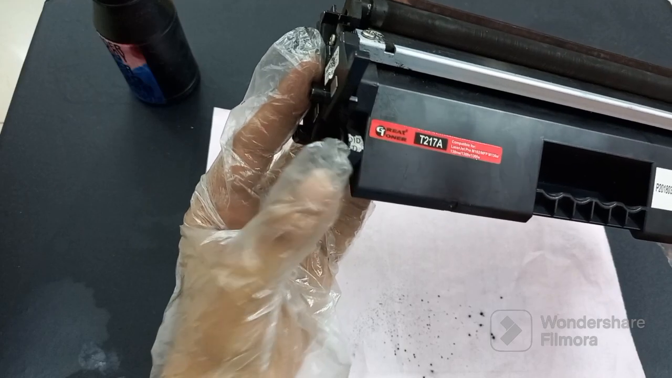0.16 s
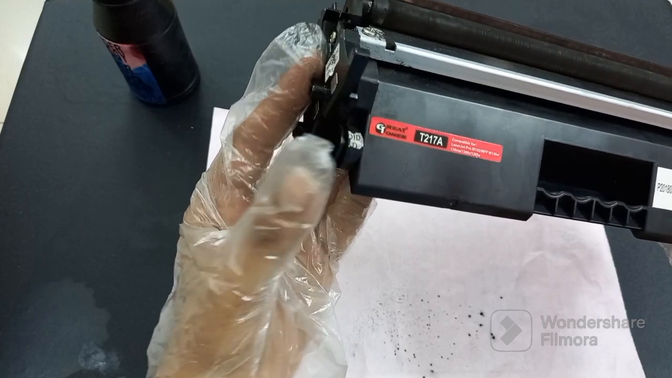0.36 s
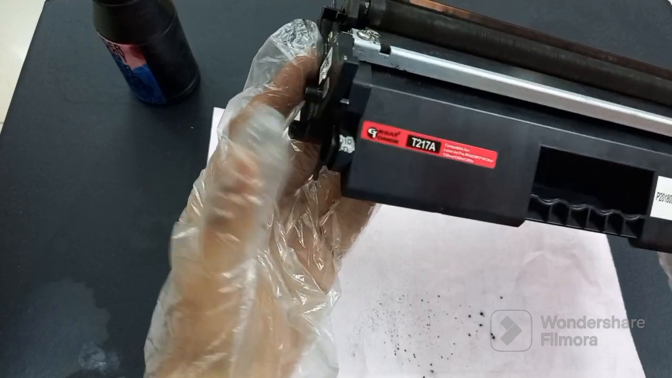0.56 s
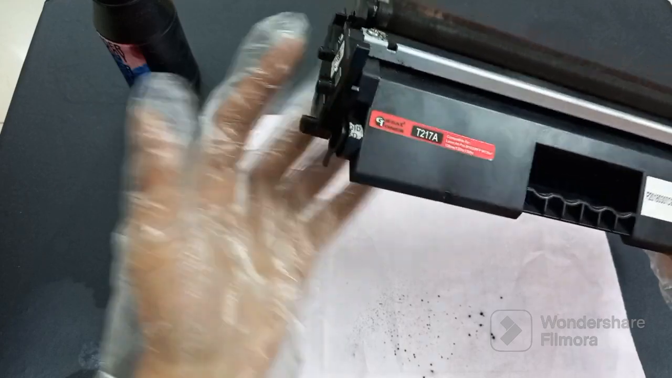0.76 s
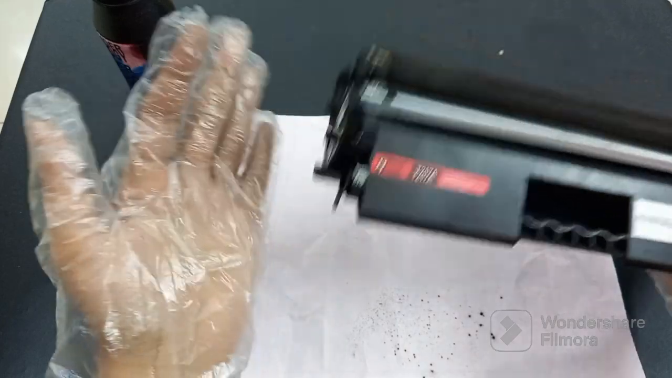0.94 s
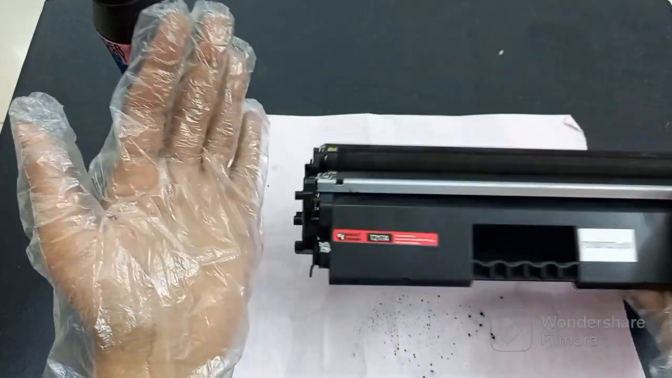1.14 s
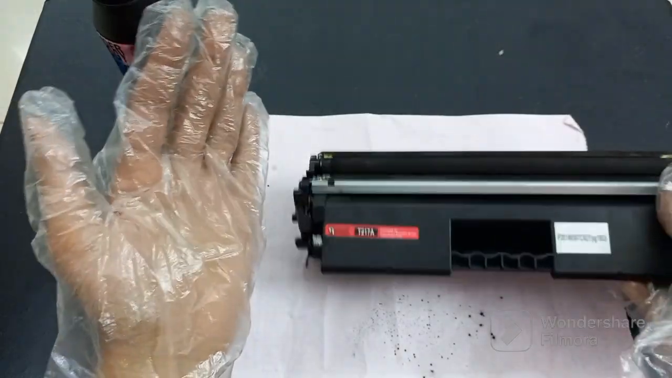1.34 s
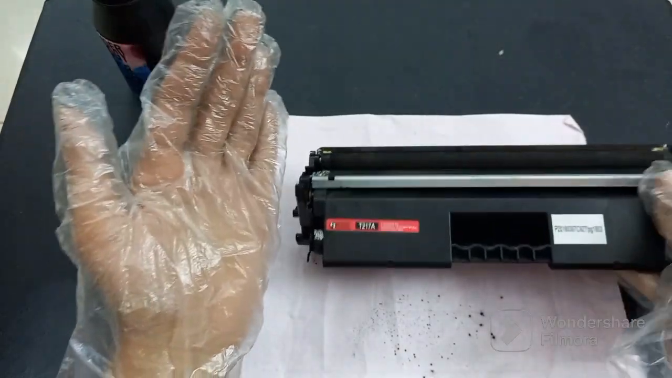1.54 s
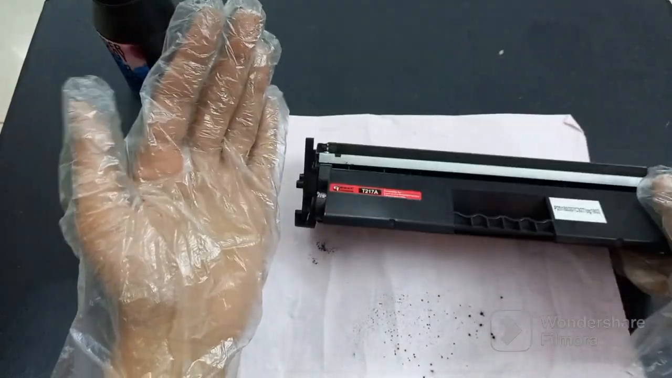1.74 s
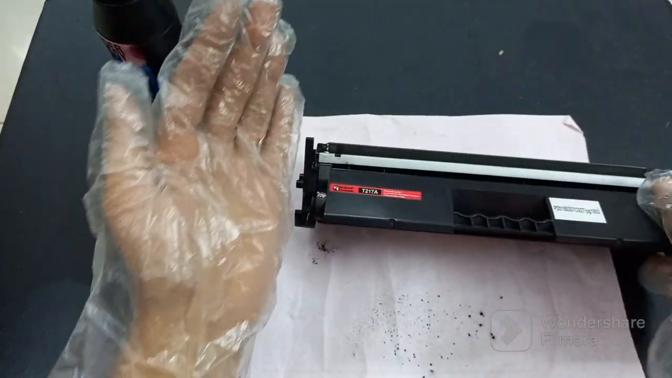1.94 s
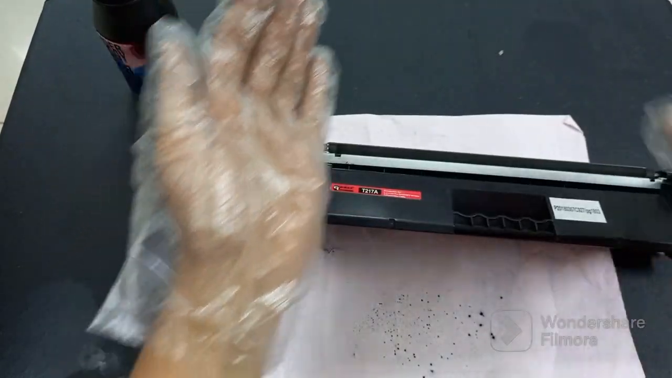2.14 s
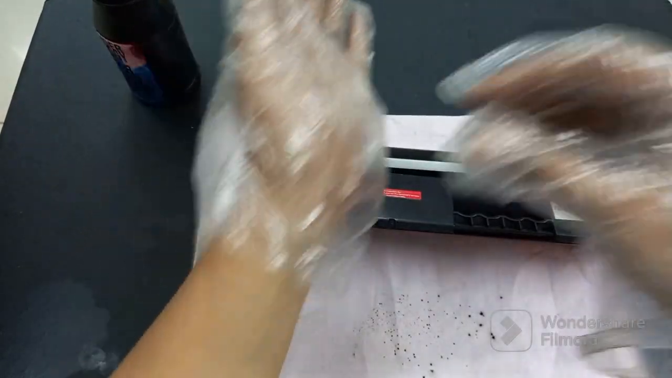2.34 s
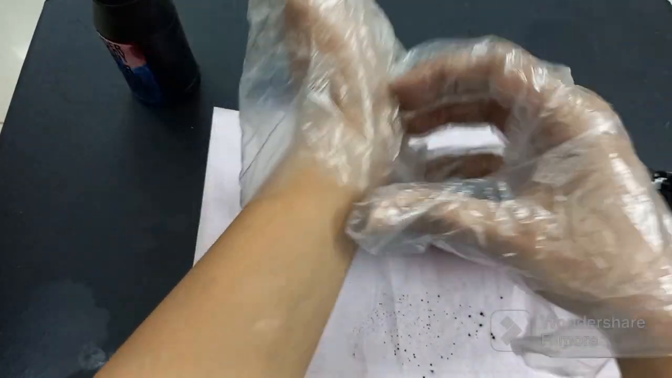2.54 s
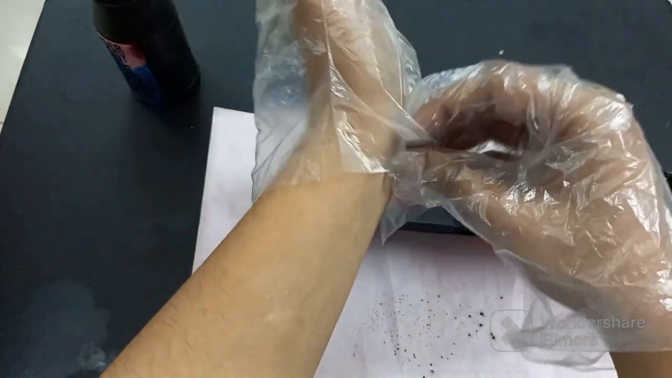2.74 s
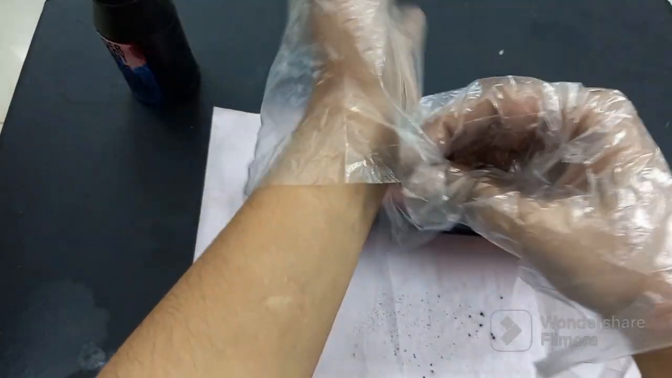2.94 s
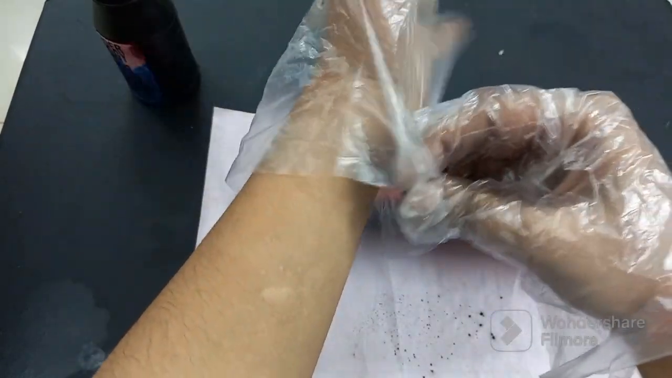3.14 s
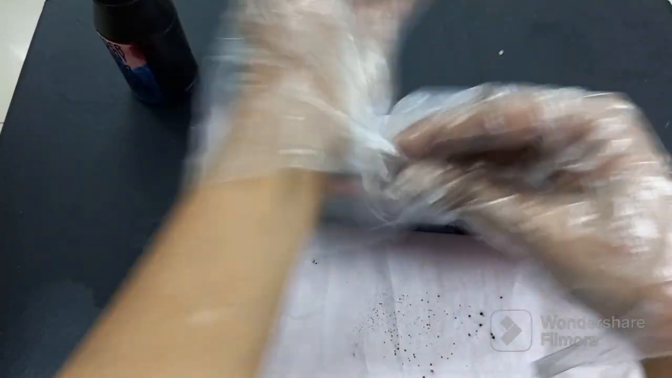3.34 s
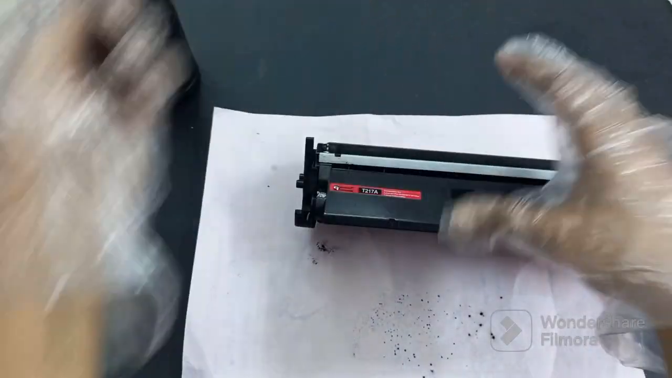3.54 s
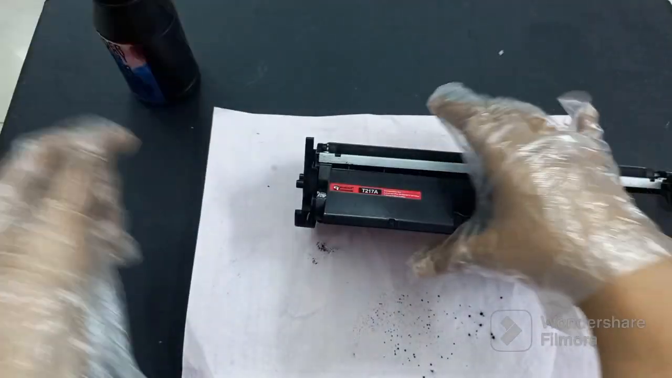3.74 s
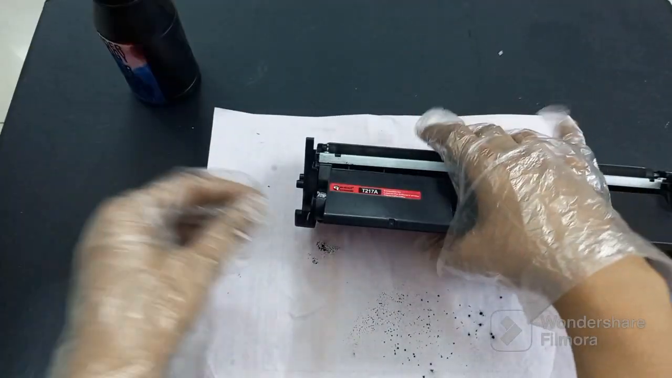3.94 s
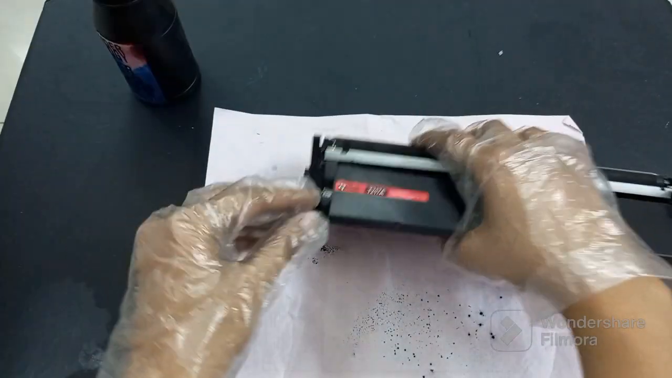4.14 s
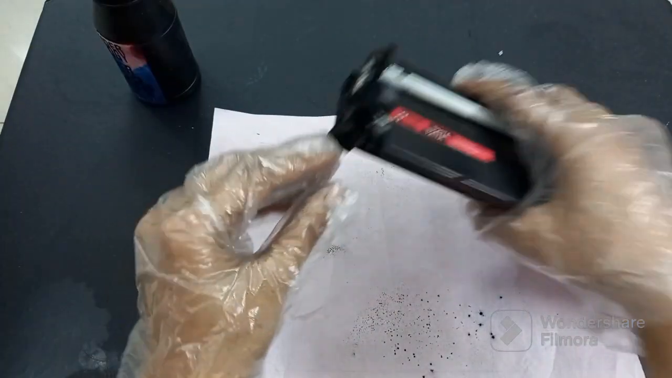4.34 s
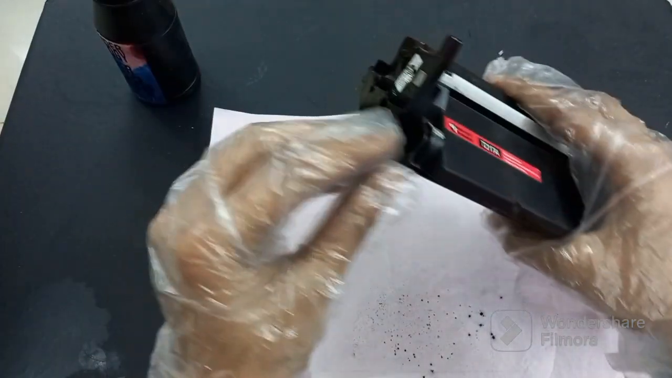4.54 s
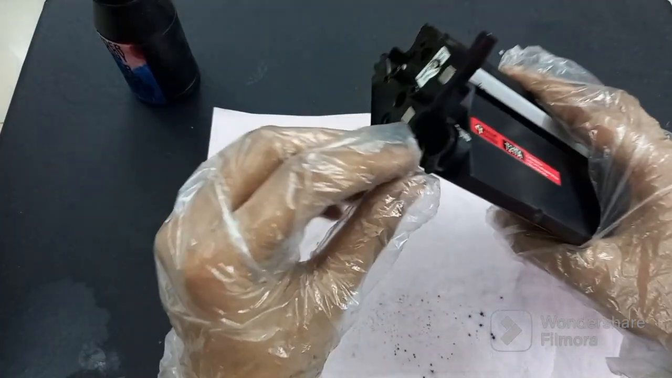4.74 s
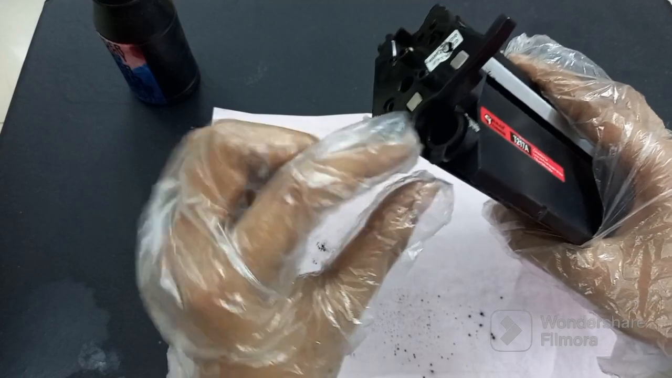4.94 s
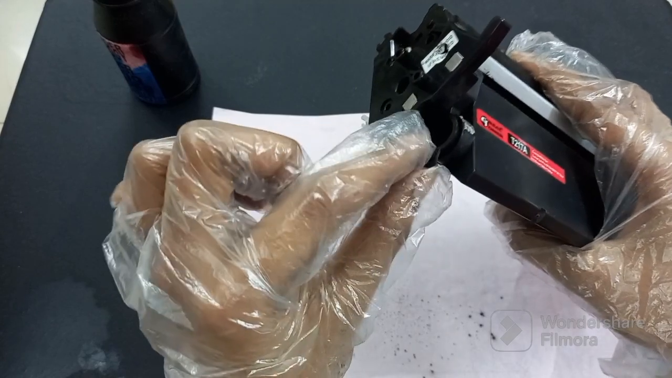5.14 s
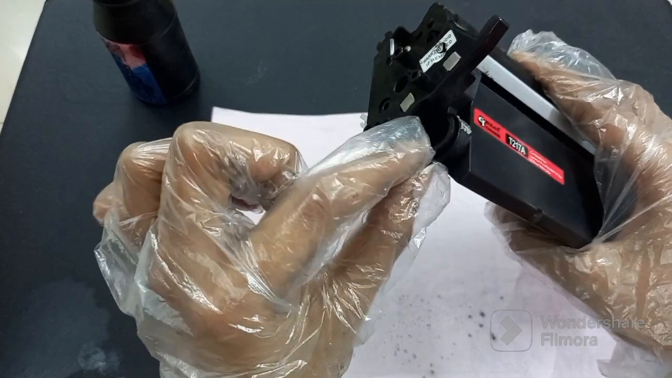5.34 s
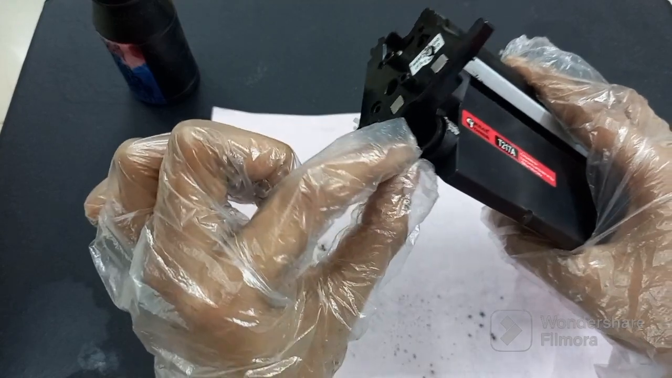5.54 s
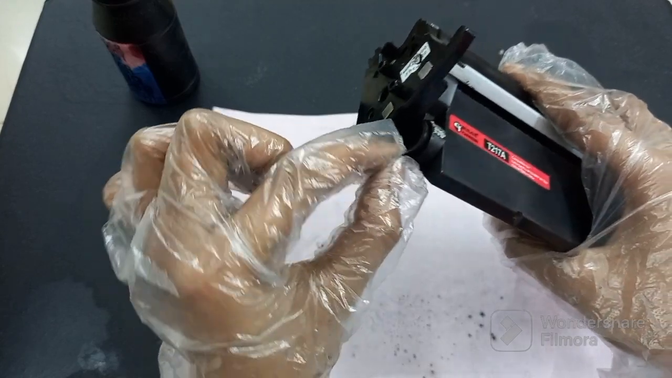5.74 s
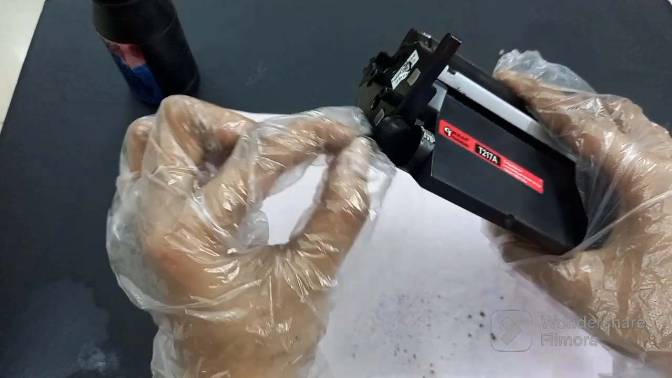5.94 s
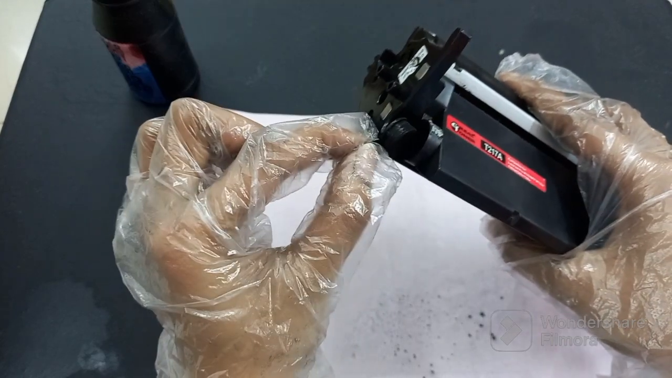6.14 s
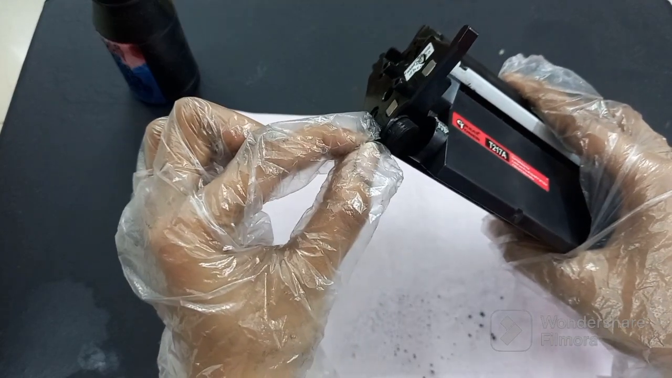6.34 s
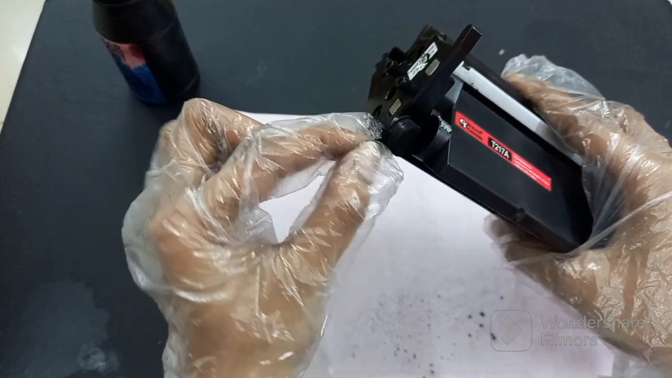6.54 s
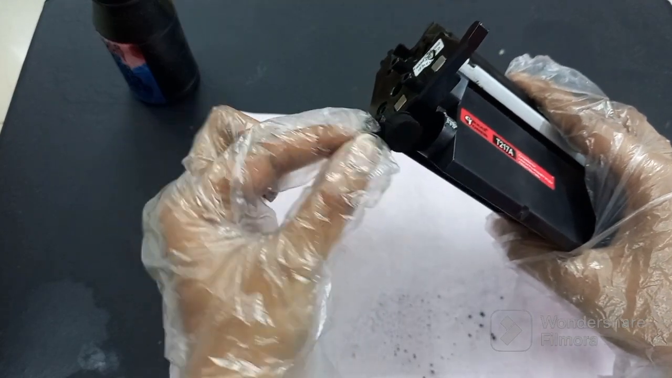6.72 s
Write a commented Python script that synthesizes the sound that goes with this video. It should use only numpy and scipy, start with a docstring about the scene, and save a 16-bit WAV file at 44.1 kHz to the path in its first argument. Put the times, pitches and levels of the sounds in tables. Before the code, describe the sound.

A hollow plastic cartridge knocks down on a table amid the crisp, uneven crackle of thin plastic gloves, over a low hum.

```python
"""A low machine hum fills a small room. From the start, hands in thin plastic gloves handle a plastic
printer cartridge close to a two-port microphone: the film crackles as its creases snap, and the hollow
shell rumbles under the fingers. Around 1.5 s the cartridge is set down with three knocks that make
table and shell ring. The crackle is busiest near 3 s; from 3.5 s loose parts click lightly as the
cartridge is gripped. After 5.5 s the crackle thins out."""
import sys
import numpy as np
from scipy import signal
from scipy.fft import rfft, irfft, next_fast_len
from scipy.io import wavfile
from scipy.ndimage import uniform_filter1d

SR = 44100
rng = np.random.default_rng(int(sys.argv[2]) if len(sys.argv) > 2 else 0)


def master(y):
    """Save y as 16-bit WAV."""
    cut = np.clip(np.atleast_2d(y).T, -1, 1)
    pcm = np.round(cut * 32767)  # scale
    wavfile.write(sys.argv[1], SR, pcm.astype(np.int16))


N = 303408

# Pitches of the machine's hum: f/Hz, width/Hz, level/dB
HUM_PEAKS = [(69, 28, -3), (94.9, 13, -0.5), (192.7, 40, -8.5)]
# How loud the hum is: t/s, level/dB
HUM_LOUDNESS = [(0, -58), (5.5, -59), (6.3, -63), (6.88, -62)]
# Tone of the room's air: f/Hz, level/dB
AIR_TONE = [(15, -48), (25, -54), (97, 1.5), (145, -8), (326, -12.5), (384, -8), (659, -20.5), (2220, -35),
            (4610, -53), (6560, -30.5), (7510, -33), (11900, -45), (16000, -71)]
# Crackle of small creases during long hand movements: t/s, level/dB
HAND_MOVES = [(0, -87), (.26, -104), (.37, -83), (.46, -53), (.55, -47), (.78, -46), (.86, -48),
              (1.04, -46), (1.2, -63.5), (1.29, -63), (1.44, -60), (1.61, -49), (1.76, -44.5),
              (1.91, -47.5), (2.0, -56), (2.27, -51), (2.55, -47.5), (2.76, -46.5), (2.88, -41), (3.0, -38),
              (3.18, -42), (3.24, -45), (3.29, -40), (3.46, -36.5), (3.54, -41.5), (3.62, -42), (3.84, -47),
              (4.14, -43), (4.41, -49.5), (4.49, -52), (4.58, -50.5), (4.81, -49.5), (5.02, -44.5),
              (5.25, -48.5), (5.4, -56), (5.94, -57), (6.11, -64), (6.5, -81.5), (6.64, -74.5),
              (6.73, -57.5), (6.88, -54)]
# Crackle from short finger twitches: peak t/s, level/dB, length/s
FINGER_TWITCHES = [(.08, -49, 0.097), (.2, -55.5, 0.16), (.295, -54.5, 0.063), (.42, -56, 0.12),
                   (1.39, -90, .1), (1.738, -43, .03), (2.14, -52.5, 0.27), (2.39, -52.5, 0.25),
                   (2.64, -45, .14), (2.825, -38.5, 0.12), (4.73, -52.5, 0.09), (5.48, -54.5, 0.13),
                   (5.63, -56.5, 0.11), (5.83, -53, 0.17), (5.98, -52, 0.11), (6.16, -63, 0.095),
                   (6.34, -64.5, 0.095), (6.44, -75, .07)]
# Bigger creases compared with small ones: t/s, middle level/dB, wide level/dB
CREASE_MIX = [(0, -5, -12), (.45, -2, -11.5), (.65, -3, -6), (.85, -3.5, -12.5), (1.05, 0, -8.5),
              (1.3, 1, -25), (1.5, 2, -0.5), (1.87, -2, -5.5), (2.1, -3, -12), (2.6, -3, -3.5),
              (3.2, -5, -7.5), (4.14, -2.5, -4.5), (4.7, -5, -11), (5.0, -2, -8.5), (5.5, -2.5, -16),
              (5.9, -6, -17.5), (6.0, -2, -7), (6.2, -4, -18), (6.88, -4.5, -17)]
# Where the hands are: t/s, left over right/dB
HAND_PLACES = [(0.0, -2), (0.27, 9), (0.42, -4), (1.11, 4), (1.53, -2.5), (4.98, 4.5), (5.27, 8), (6.15, 3),
               (6.57, 8.5), (6.88, 4.5)]
# Single creases that snap: t/s, level/dB, dull part compared with that level/dB
CREASE_SNAPS = [(0.0297, -48, -8), (0.0722, -29, -14.5), (0.1436, -44, -2.5), (0.2433, -65, -16),
                (0.286, -45.5, -15), (0.2955, -35, -21.5), (0.3224, -38.5, -11), (0.394, -38, -21),
                (0.463, -48, -4.5), (0.5964, -29, -13), (0.7537, -29, -17.5), (1.1106, -31, -40),
                (1.1493, -41, -7), (2.339, -32, -27), (2.7337, -26, -16), (2.9913, -28, -8),
                (4.387, -30.5, -6), (4.4139, -22, -19), (4.4526, -32, -10.5), (4.4892, -41, -6),
                (4.5745, -28.5, -24), (4.607, -28, -17), (4.6408, -30, -14), (4.7217, -31, -27),
                (4.731, -33, -25), (4.8408, -33, -15), (4.9108, -30.5, -30), (5.018, -31, -14),
                (5.24, -29, -21), (5.2952, -43, -24.5), (5.6104, -38.5, -19), (5.7817, -35.5, -15),
                (5.8182, -40, -6.5), (5.8563, -34, -19), (5.9597, -51.5, -21), (5.9738, -30, -28),
                (6.0847, -45.5, -22), (6.1463, -43.5, -16), (6.345, -46.5, -25), (6.3866, -46, -8),
                (6.432, -46.5, -15), (6.535, -69, -8), (6.5488, -54.5, -9), (6.6055, -58, -2.5),
                (6.6262, -61, -17), (6.64, -52, -9), (6.6803, -44.5, -13.5), (6.7205, -40, -22),
                (6.7508, -36, -17.5), (6.7646, -48, -2), (6.8159, -50.5, -21), (6.8334, -39.5, -9.5)]
# Tones of small creases, middle creases and wide folds: f/Hz, level/dB
SMALL_TONE = [(6800, -40.5), (7700, -8.5), (8600, -6.5), (10300, 1), (12300, 2.5), (13800, -2.5),
              (15000, -20.5), (16000, -16)]
MIDDLE_TONE = [(2200, -17.5), (3200, -9), (4300, -4.5), (5300, -3.5), (6700, 0.5), (7200, -2.5),
               (7800, -10)]
WIDE_TONE = [(250, -14), (500, -5), (900, -3.5), (1600, 0.5), (2300, 1), (3300, -2), (4500, -14)]
# Fingers shift on the hollow shell: peak t/s, level/dB, length/s
GRIP_SHIFTS = [(.39, -53.5, 0.13), (.53, -60, 0.44), (2.98, -57, 0.46), (3.43, -59, 0.27), (4.05, -67, .25),
               (4.42, -52, .15), (4.95, -55.5, 0.22)]
# Tone of the shell's rumble: f/Hz, level/dB
SHELL_TONE = [(120, -56), (200, -1), (300, -6.5), (450, -4.5), (650, -29), (1000, -31.5)]
# The cartridge lands or bounces: t/s, level/dB, table top share/dB, frame share/dB, edge share/dB
LANDINGS = [(1.466, -21, -3, -7.5, -7.5), (1.5399, -20.5, 0, -5.5, -13.5), (1.564, -31, 6, -25.5, -37.5),
            (1.7623, -10, -1.5, -5, -17.5), (1.789, -16, -11, -35, -28)]
# Notes at which table and shell ring: f/Hz, level/dB, t60/s (time to fade by 60 dB), rise/s
RINGING_NOTES = [(75.6, -8, 0.6, 0.035), (98.5, 0, 0.24, 0.019), (152, -9.5, 0.34, .02),
                 (183.5, -4.5, 0.21, 0.0088), (232.5, -11.5, 0.23, 0.01), (273.7, -6, 0.13, 0.0076),
                 (335, -25.5, 0.106, .003), (394.2, -14.5, 0.54, 0.0014), (390, 1.5, 0.055, 0.00061),
                 (463, -10.5, 0.14, 0.016), (477, -42, 0.22, 0.0028), (492, -22, 0.1, .002),
                 (684, -18.5, 0.11, 0.0007), (716, -23, 0.099, .001), (777, -22, 0.058, 0.0012),
                 (846, -24, 0.16, 0.00107), (913, -55, 0.083, .001), (1304, -26, 0.068, 0.0022),
                 (1460, -33.5, 0.15, .001), (1687, -31, 0.095, .001)]
# Tone of the clack of the shell's edge: f/Hz, level/dB
EDGE_TONE = [(300, -39), (700, -1.5), (1400, -1), (2600, -8), (6000, -17), (12000, -21)]
# Loose parts of the cartridge click: t/s, level/dB, f/Hz, t60/s, left over right/dB
PART_CLICKS = [(3.468, -41, 1610, 0.091, 11), (3.992, -35, 1055, 0.037, 16.5), (4.008, -48, 930, 0.13, 31),
               (4.009, -36, 410, 0.019, 2), (4.02, -37, 253, 0.032, 8), (4.029, -43, 1927, 0.16, -7),
               (4.084, -40, 1340, 0.052, 1), (4.166, -29.5, 1730, 0.02, 0), (4.462, -40, 1640, 0.023, -4),
               (5.976, -42.5, 1560, 0.044, 2)]
# How long the room rings: f/Hz, t60/s
ROOM_FADE = [(200, 0.34), (1500, 0.5), (6000, 0.073), (14000, 0.084)]
# How alike left and right sound: f/Hz, likeness (0 unrelated, 1 the same)
LIKENESS = [(60, 0.91), (300, 0.86), (700, 0.12), (1500, 0.32), (3100, 0), (6800, 0)]
# Balance of the microphone's two ports: f/Hz, left over right/dB
PORT_BALANCE = [(420, -1.4), (700, -5), (1200, -1), (4400, -1), (9000, 1.26)]

TOP_HZ = 15860  # nothing higher is kept


def amp(db):
    """Turn decibels into a gain; amp(2 * db) gives power."""
    return 10 ** (np.asarray(db) / 20)


def unit(x):
    """Scale a signal to an average power of 1."""
    return x / np.sqrt(np.mean(x ** 2) + 1e-20)


def along(points, hz):
    """Read a (frequency, value) table between its rows, on a log axis."""
    f, values = np.transpose(points)
    return np.interp(np.log(hz + 1), np.log(f + 1), values)


def curves(rows):
    """One value per sample for each column after the time."""
    times, *columns = np.transpose(rows)
    return [np.interp(np.arange(N) / SR, times, column) for column in columns]


def sides(pan_db):
    """Left and right gains."""
    return amp(np.array([pan_db / 2, -pan_db / 2]))


def filtered(x, response):
    """Turn each frequency of x up or down by response(hz)."""
    size = next_fast_len(N + SR // 4)
    return irfft(rfft(x, size) * response(np.fft.rfftfreq(size, 1 / SR)), size)[..., :N]


def stereo_noise():
    """An even hiss whose two sides are alike in the bass and unrelated in the treble."""
    size = next_fast_len(N)
    hz = np.fft.rfftfreq(size, 1 / SR)
    angle = np.arccos(np.clip(along(LIKENESS, hz), -1, 1)) / 2
    phases = np.exp(2j * np.pi * rng.random((2, len(hz))))
    mid, side = phases * [np.cos(angle), np.sin(angle)]
    return unit(irfft(np.array([mid + side, mid - side]), size)[:, :N])


def colour(x, tone):
    """Give a hiss the tone in a table while keeping its power."""
    return filtered(x, lambda hz: unit(amp(along(tone, hz)) * (hz < TOP_HZ)))


def dying(kicks, t60, rise):
    """Loudness curve in which each kick of power builds over rise seconds and dies away."""
    fade, soften = amp(-120 / (t60 * SR)), np.exp(-1 / (rise * SR))
    power = signal.lfilter([1 - soften], np.convolve([1, -fade], [1, -soften]), kicks)
    return np.sqrt(np.abs(power))


def swells(rows):
    """Summed power of movements that climb to their peak and sink again."""
    t = np.arange(N) / SR
    rise_share, drop_db = 0.46, 12.5  # part of the length before the peak; drop to either end
    power = np.zeros(N)
    for peak, db, length in rows:
        distance = np.maximum((peak - t) / rise_share, (t - peak) / (1 - rise_share)) / length
        power += amp(2 * (db - drop_db * distance))
    return power


def crackle(rate, spread_db, pan_db, t60, rise):
    """Loudness curve of rate random snaps a second, few large and many small, each at its own place."""
    hits = rng.random(N) < rate / SR
    power = hits * amp(2 * spread_db * rng.exponential(1, N).clip(0, 4))
    loudness = dying(power * sides(pan_db * rng.standard_normal(N)) ** 2, t60, rise)
    average_power = uniform_filter1d(np.mean(loudness ** 2, 0), SR // 5)
    return loudness / np.sqrt(np.abs(average_power) + 1e-9)


def machine_hum():
    """A machine hums: noise squeezed into three low, narrow bands makes a wavering drone."""
    def peaks(hz):
        bands = (amp(db) * hz * width / np.abs(centre ** 2 - hz ** 2 + 1j * hz * width)
                 for centre, width, db in HUM_PEAKS)
        return sum(bands) ** 1.96  # sharpens the peaks and widens their level gaps
    return amp(curves(HUM_LOUDNESS)[0]) * unit(filtered(stereo_noise(), peaks))


def room_air():
    """The air of the room is a faint, steady rush."""
    return amp(-64) * colour(stereo_noise(), AIR_TONE)


def glove_crackle():
    """Faster movement snaps more creases a second; small ones tick high, wide folds rustle lower."""
    small_db = 10 * np.log10(amp(2 * curves(HAND_MOVES)[0]) + swells(FINGER_TWITCHES))
    middle_db, wide_db = curves(CREASE_MIX)
    place = sides(curves(HAND_PLACES)[0])
    rate = 90 + 500 * amp(1.6 * (small_db + 51.5))
    ticks = crackle(rate, spread_db=3.2, pan_db=3, t60=0.004, rise=0.0003)
    creases = crackle(0.8 * rate, spread_db=2.5, pan_db=8, t60=0.16, rise=0.00081)
    folds = crackle(0.27 * rate, spread_db=1.5, pan_db=-4.5, t60=0.065, rise=0.0015)
    # each size of crease shares part of its crackle with its neighbours
    small = amp(small_db - 1.5) * np.sqrt(0.75 * ticks ** 2 + 0.68 * creases ** 2)
    middle = amp(small_db + middle_db) * np.sqrt(0.71 * ticks ** 2 + 1.22 * creases ** 2)
    wide = amp(small_db + wide_db - 1.66) * np.sqrt(0.51 * creases ** 2 + 0.7 * folds ** 2)
    # single snaps stand out, each with a sharp and a dull part
    sharp, dull = np.zeros((2, N))
    for start, db, dull_db in CREASE_SNAPS:
        at = round(start * SR)
        sharp[at], dull[at] = amp(2 * db), amp(2 * (db + dull_db))
    small = np.hypot(small, dying(sharp, t60=0.0027, rise=0.0013))
    middle = np.hypot(middle, amp(6) * dying(dull, t60=0.006, rise=0.00071))
    return (colour(place * small * stereo_noise(), SMALL_TONE)
            + colour(place ** 0.54 * middle * stereo_noise(), MIDDLE_TONE)
            + colour(wide * stereo_noise(), WIDE_TONE))


def shell_rumble():
    """The hollow shell gives a soft, lumpy rumble as fingers shift on it."""
    loudness = np.sqrt(swells(GRIP_SHIFTS))
    lumps = crackle(rate=150, spread_db=3, pan_db=1, t60=0.085, rise=0.0042)
    return colour(loudness * lumps * stereo_noise(), SHELL_TONE)


def table_knocks():
    """Each landing or bounce rings table and shell; the heavy low notes swell late."""
    thud, clack = np.zeros((2, N + SR))
    t = np.arange(SR * 2 // 3) / SR
    hz, note_db, t60, rise = np.transpose(RINGING_NOTES)[..., None]
    settling = amp(-11 * np.clip((t - 0.076) / 0.012, 0, 1))  # the weight settles and damps the table
    for start, db, top_db, frame_db, edge_db in LANDINGS:
        at = round(start * SR)
        share_db = np.where(hz < 160, frame_db, np.where(hz < 300, top_db, 0))
        struck_db = note_db + share_db + rng.normal(0, 1, hz.shape)
        ring = amp(struck_db - 60 * t / t60) * (1 - np.exp(-t / rise)) * settling
        thud[at:at + len(t)] -= amp(db) * (ring * np.sin(2 * np.pi * hz * t)).sum(0)
        clack[at:at + len(t)] += amp(db + edge_db - 60 * t / 0.047) * (1 - np.exp(-t / 0.0005))
    return thud[:N] + colour(clack[:N] * stereo_noise(), EDGE_TONE)


def part_clicks():
    """Loose plastic parts tick: two close notes ring briefly under a dry puff of noise."""
    out, t = np.zeros((2, N + SR)), np.arange(SR // 5) / SR
    for start, db, hz, t60, pan_db in PART_CLICKS:
        at = round(start * SR)
        notes = np.sin(2 * np.pi * hz * t) + 0.5 * np.sin(2 * np.pi * 0.96 * hz * t)
        band = signal.butter(1, [0.5 * hz, 1.5 * hz], "band", fs=SR)
        puff = signal.lfilter(*band, rng.standard_normal(len(t)))
        loudness = amp(db - 60 * t / t60) * (1 - np.exp(-t / 0.001))
        out[:, at:at + len(t)] += sides(pan_db)[:, None] * loudness * (0.68 * notes + 1.72 * puff)
    return out[:, :N]


def room_echo(x):
    """The walls throw the sound back, and each frequency dies away at its own speed."""
    hz, t, spectrum = signal.stft(stereo_noise()[:, :SR // 2], SR, nperseg=256)
    fade = amp(-60 * t / along(ROOM_FADE, hz)[:, None])
    tail = signal.istft(spectrum * fade, SR, nperseg=256)[1]
    delayed = np.pad(x, ((0, 0), (200, 0)))
    return signal.fftconvolve(delayed, tail / np.linalg.norm(tail[0]), axes=1)[:, :N]


def scene():
    """Gloves and cartridge near the microphone, with their echo, over the hum and the air."""
    gloves, knocks, clicks = glove_crackle(), table_knocks(), part_clicks()
    nearby = gloves + shell_rumble() + knocks + clicks
    echo = room_echo(amp(-13.5) * gloves + amp(-11) * knocks + amp(-13) * clicks)
    return nearby + echo + machine_hum() + room_air()


def record(dry):
    """The microphone's two ports differ a little in tone; deep bass and the highest treble are cut."""
    def response(hz):
        bass_cut = 1 / np.sqrt(1 + (58 / (hz + 1)) ** 5)
        return sides(along(PORT_BALANCE, hz)) * bass_cut * (hz < TOP_HZ)
    return filtered(dry, response)


dry = scene()
out = record(dry)
master(out)
```